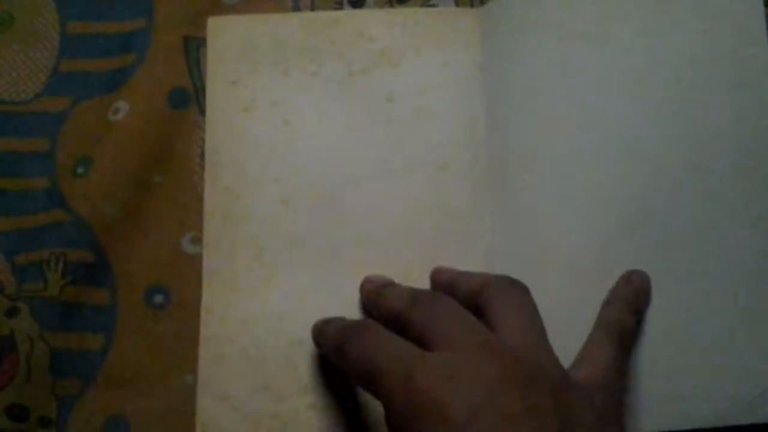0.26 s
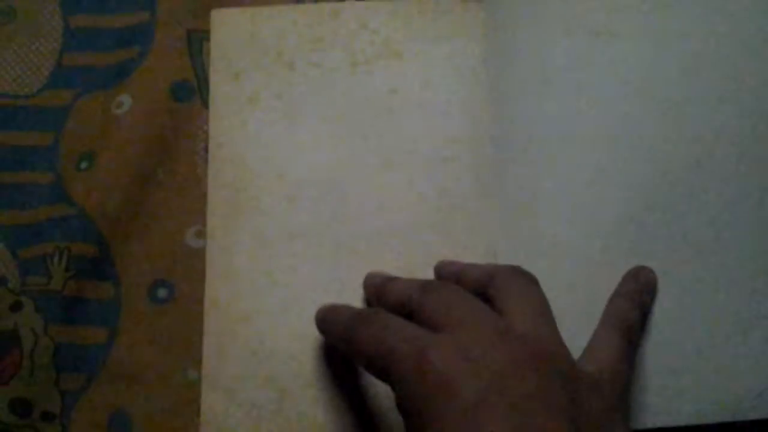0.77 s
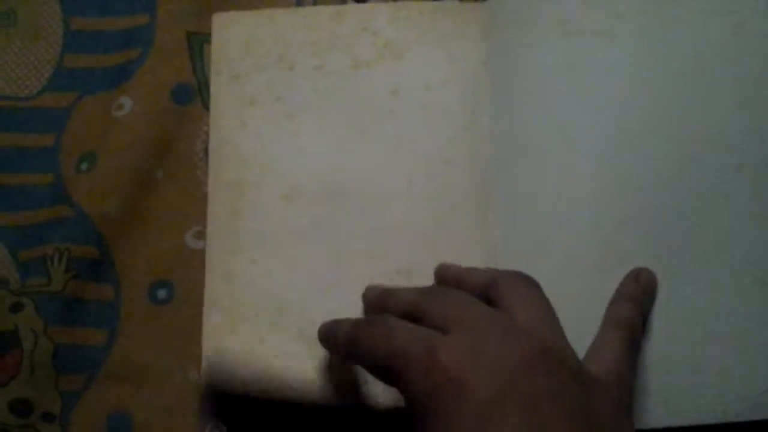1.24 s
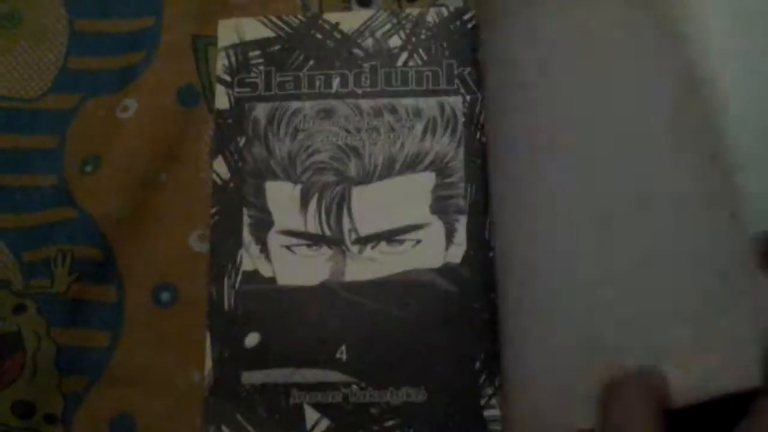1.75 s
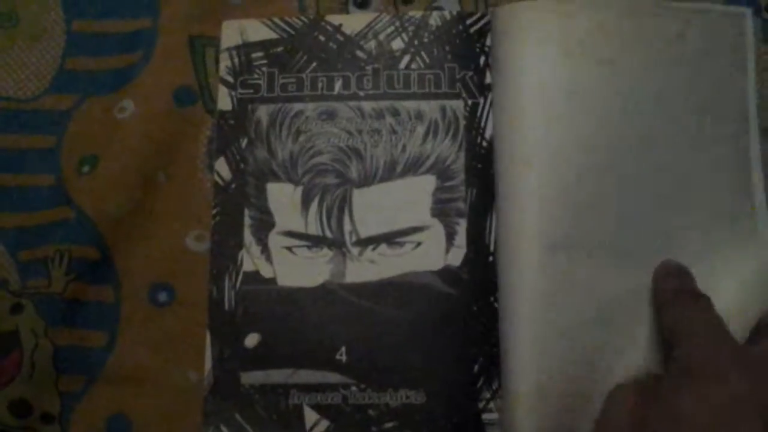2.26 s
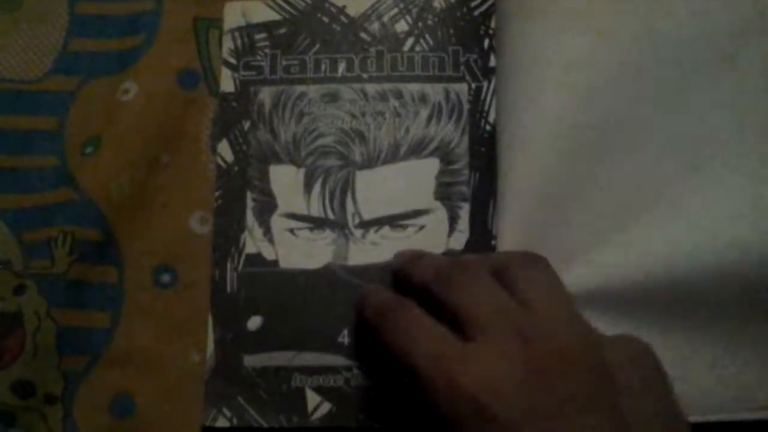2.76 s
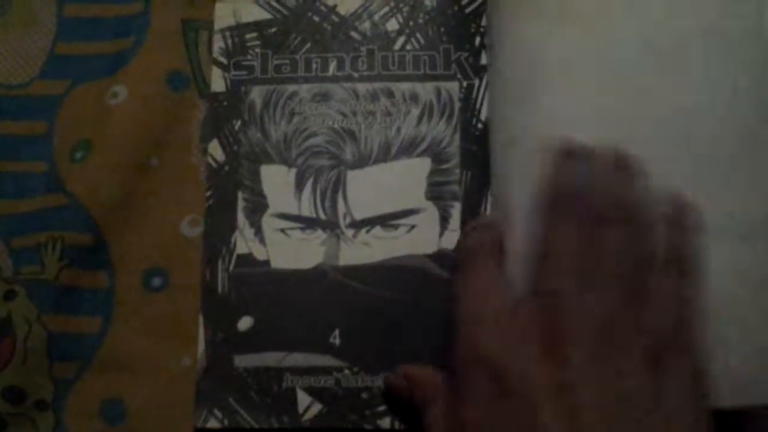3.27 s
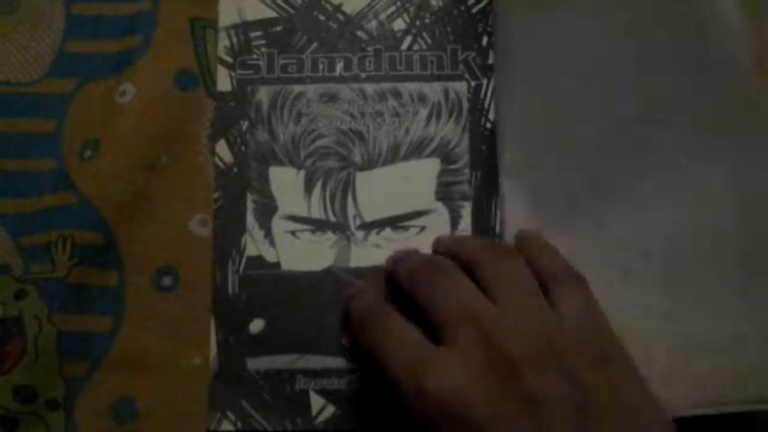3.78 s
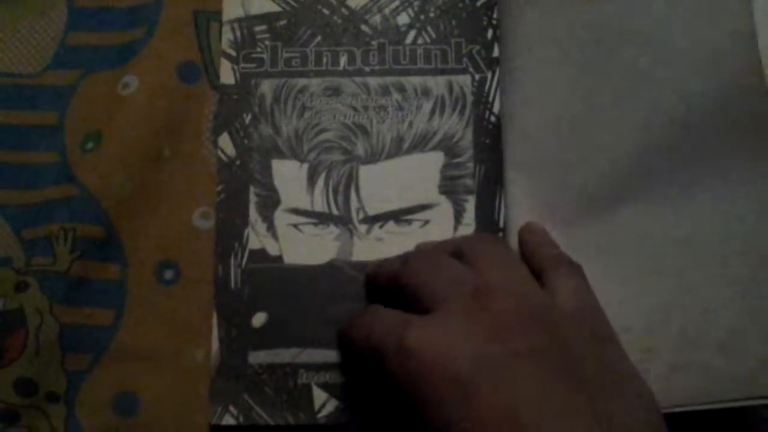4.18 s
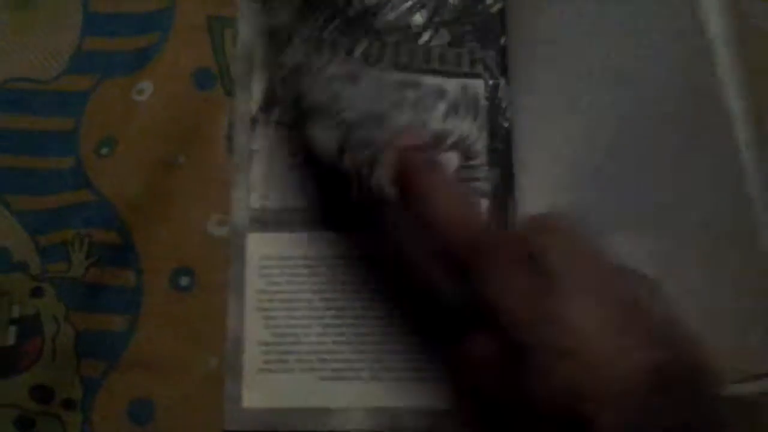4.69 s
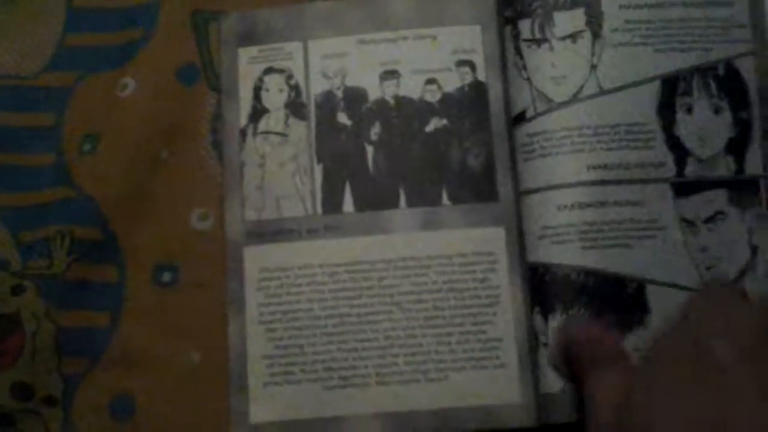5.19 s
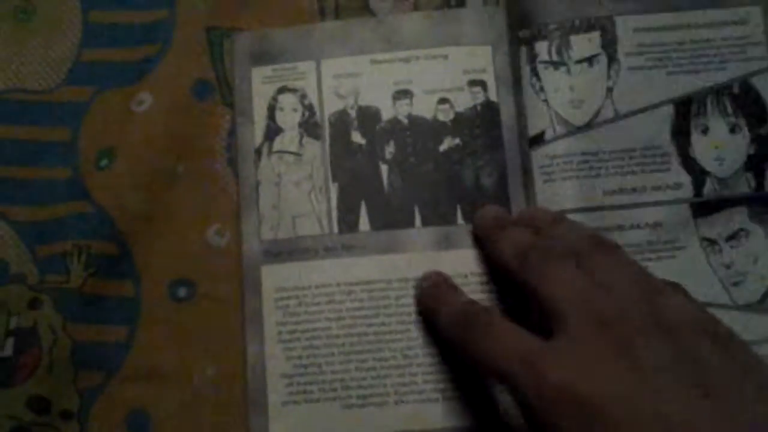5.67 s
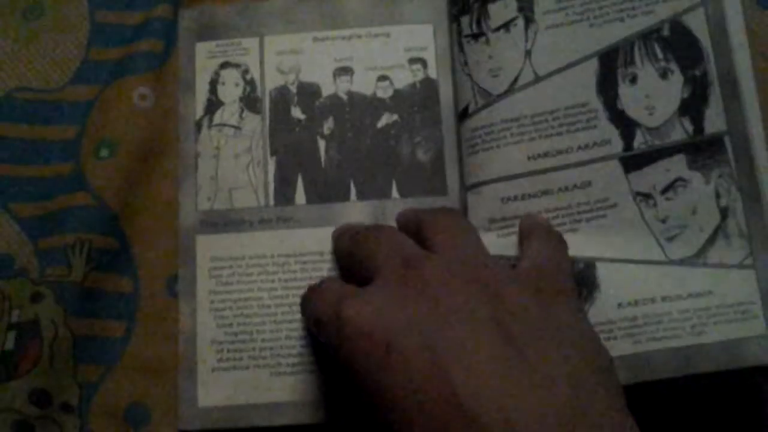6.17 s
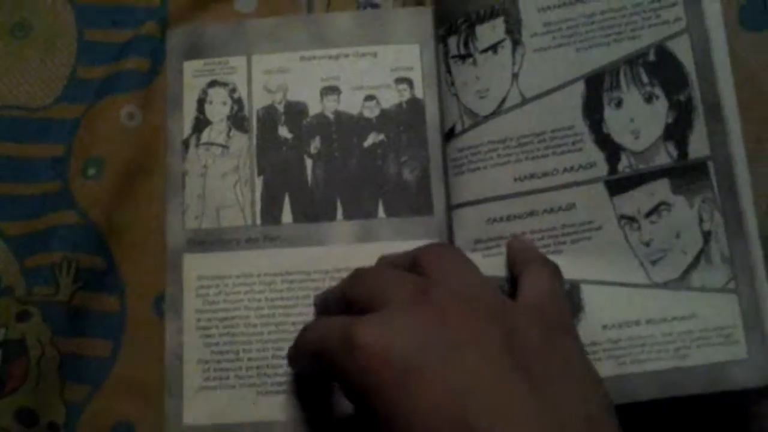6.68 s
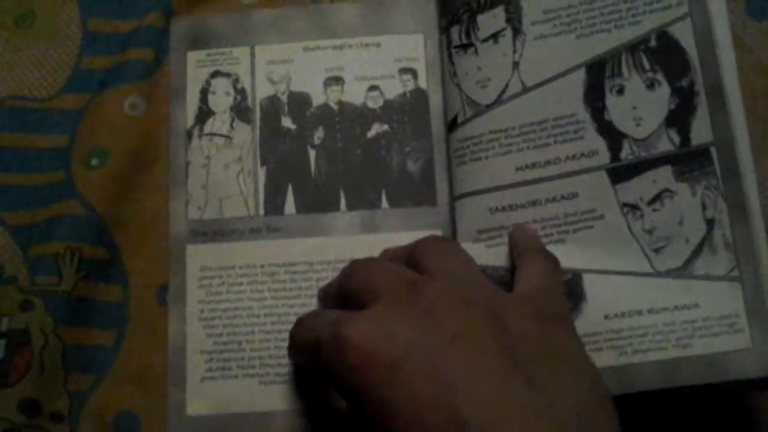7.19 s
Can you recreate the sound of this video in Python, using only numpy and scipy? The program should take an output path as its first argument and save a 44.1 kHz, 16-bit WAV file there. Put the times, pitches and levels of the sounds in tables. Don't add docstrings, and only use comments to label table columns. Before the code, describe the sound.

Close paper flicks run at a brisk, slightly uneven pace, bright at the edge and dull in the body, with a short reflection from a near wall. They stop after three seconds. Low fingertip bumps come next, then a light crinkling page lift and a hard little snap, then soft taps. Steady fan noise, faint rumble and hiss lie beneath, with a distant low hum swelling twice; the sound is almost centred.

```python
import sys
import numpy as np
from scipy import signal
from scipy.fft import rfft, irfft
from scipy.io import wavfile

SR = 44100
rng = np.random.default_rng(int(sys.argv[2]) if len(sys.argv) > 2 else 0)


def to_linear_factor(level_db):
    exponent = np.asarray(level_db, float) / 20
    return 10 ** exponent


def store_wav(level_fs):
    pcm = np.round(np.clip(np.atleast_2d(level_fs), -1, 1) * 32767)
    wavfile.write(sys.argv[1], SR, pcm.T.astype(np.int16))


N = 328104


def unit(x):
    return x / np.sqrt(np.mean(x ** 2) + 1e-20)


def in_time(rows, outside):
    s, *columns = np.transpose(rows)
    t = np.arange(N) / SR
    return [np.interp(t, s, column, left=outside, right=outside) for column in columns]


def drift(rate_hz):
    r = np.exp(-2 * np.pi * rate_hz / SR)
    settled = signal.lfilter([1], [1, -2 * r, r * r], rng.standard_normal(N + SR))[SR:]
    return unit(settled)


def colour(x, spectrum, peaks=()):
    size = 8192
    hz = np.maximum(np.fft.rfftfreq(size, 1 / SR), 1)
    points = np.array(spectrum)
    gain = to_linear_factor(np.interp(np.log(hz), np.log(points[:, 0]), points[:, 1]))
    for centre, width, peak_db in peaks:
        gain = gain * to_linear_factor(peak_db / (1 + (2 * (hz - centre) / width) ** 2))
    cepstrum = irfft(np.log(gain + 1e-6))
    cepstrum[1:size // 2] *= 2
    cepstrum[size // 2 + 1:] = 0
    response = irfft(np.exp(rfft(cepstrum)))
    return signal.fftconvolve(x, response / np.sqrt(np.sum(response ** 2)))[:N]


def grains(per_s, spread_db):
    sizes = to_linear_factor(spread_db * np.minimum(rng.exponential(1, N), 4)) * rng.standard_normal(N)
    return unit(sizes * (rng.random(N) < per_s / SR))


# [t/s, level/dB]
SLIDE = [(0.0, -47), (0.13, -61), (0.3, -59), (0.55, -68), (0.85, -54.5), (2.0, -57), (2.75, -50.5),
         (3.1, -61)]
# [f/Hz, level/dB per Hz]
EDGE = [(2650, -17.5), (4500, -13), (6150, -15), (6470, -10.5), (8750, 0.5), (11400, -0.5), (12600, -7.5),
        (13900, -5.5), (14600, 15), (15000, -0.5)]
# [f/Hz, level/dB per Hz]
BODY = [(88, -56), (150, -20), (326, -1), (872, -5.5), (1280, -4.5), (1590, -8), (3570, -8.5),
        (5000, -19.5), (6500, -66), (11000, -120)]
# [f/Hz, width/Hz, level/dB over the spectrum]
BLOCK = [(597, 67, 9), (1273, 147, 9), (1988, 70, 9), (3507, 47, 6), (8490, 105, 9.5), (9000, 60, 8),
         (10220, 250, 5), (11900, 71, -3)]
TAIL_DB = -7.0


def riffle():
    slide = to_linear_factor(in_time(SLIDE, -120)[0] + 2.0 * drift(27))
    s, edge_db, slap_db = contacts()
    edge = strokes(s, edge_db - 7, rise_s=.005, fall_s=.008, tail_db=TAIL_DB) + slide
    body = strokes(s - .004, slap_db - 7.0, rise_s=0.0081, fall_s=0.013, tail_db=TAIL_DB + 6.0)
    crackle = to_linear_factor(1.8 * drift(70))
    crisp = colour(edge * crackle * grains(16000, 0.96), EDGE, BLOCK)
    dull = colour((body + to_linear_factor(8) * slide) * grains(12000, 0.98), BODY, BLOCK)
    return crisp + dull


# [t/s, edge peak level/dB, slap peak level/dB, rebound delay/s, rebound peak level/dB]
FLICKS = [(0.0315, -17, -26.5, 0.13, -28), (0.311, -18, -25.5, 0.13, -32), (0.603, -13.5, -22.5, .097, -24),
          (0.8, -8, -12, 0.083, -21), (1.006, -13, -22.5, 0.097, -25), (1.214, -13, -18, 0.09, -24),
          (1.4247, -15, -19.5, 0.098, -26.5), (1.6353, -9.5, -12.5, 0.086, -20.5),
          (1.8182, -12, -17.5, 0.082, -26), (2.029, -12.5, -18, .091, -22.5),
          (2.2187, -12.5, -19, 0.078, -23.5), (2.421, -13.5, -19, 0.1, -23.5),
          (2.6162, -9, -12, 0.081, -19), (2.799, -13, -19.5, 0.09, -31)]
# [lead/s, edge peak level/dB, slap peak level/dB]
CATCHES = [
    (.071, -28.5, -38),
    (0.035, -24, -30),
]
# [t/s, peak level/dB]
FOLLOWERS = [(.0653, -30), (0.343, -24.5), (.6275, -26), (1.032, -26), (1.2406, -24.5), (1.4511, -39)]
CATCH_SCATTER_S, CATCH_SCATTER_DB = .004, 2.0
REBOUND_EDGE_DB = -7.5


def contacts():
    rows = [(s, db, db) for s, db in FOLLOWERS]
    chance = rng.standard_normal((len(FLICKS), len(CATCHES), 2))
    for (s, edge_db, slap_db, delay, rebound_db), luck in zip(FLICKS, chance):
        rows.append((s, edge_db, slap_db))
        rows.append((s + delay, rebound_db + REBOUND_EDGE_DB, rebound_db))
        for (lead, catch_db, dull_db), (early, louder) in zip(CATCHES, luck):
            catch_s = s - lead + CATCH_SCATTER_S * early
            rows.append((catch_s, catch_db + CATCH_SCATTER_DB * louder, dull_db))
    return np.transpose([row for row in rows if row[0] > .01])


WALL_S, WALL_DB = .021, -2.5
TAIL_T60_S = .15
BEND_S, BEND_DB = 0.042, -19.5


def strokes(times, levels_db, rise_s, fall_s, tail_db):
    marks = np.zeros(N)
    marks[(np.asarray(times) * SR).astype(int)] = to_linear_factor(levels_db) ** 2
    lead = SR // 4
    t = (np.arange(SR) - lead) / SR
    bend = to_linear_factor(BEND_DB) ** 2 * np.exp(-2 * np.abs(t) / BEND_S) * (t < rise_s)
    hit = np.clip(t / rise_s, 0, 1) ** 2 * np.exp(-2 * np.maximum(t - rise_s, 0) / fall_s)
    echo = to_linear_factor(WALL_DB) ** 2 * np.interp(t - WALL_S, t, hit)
    decay_db = tail_db - 60 * np.maximum(t - WALL_S, 0) / TAIL_T60_S
    tail = to_linear_factor(decay_db) ** 2 * np.clip(t / WALL_S, 0, 1)
    power = signal.fftconvolve(marks, bend + hit + echo + tail)[lead:lead + N]
    return np.sqrt(np.maximum(power, 0))


# [t/s, level/dB]
TURN = [
    (4.6, -61),
    (4.998, -55),
    (5.28, -64),
    (5.5, -59),
]
# [t/s, peak level/dB]
CRUMPLES = [(4.7844, -41), (4.8464, -34), (4.9124, -39), (4.9354, -42), (4.9744, -35), (5.034, -32),
            (5.1094, -48), (5.1344, -40), (5.1894, -52), (5.2639, -40), (5.2994, -43), (5.3564, -44)]


def page_turn():
    s, peak_db = np.transpose(CRUMPLES)
    marks = np.zeros(N)
    marks[(s * SR).astype(int)] = to_linear_factor(peak_db - 5.0)
    flares = signal.lfilter([1], [1, -np.exp(-1 / (0.015 * SR))], marks + 1e-18)
    level = to_linear_factor(in_time(TURN, -120)[0] + 2.6 * drift(30)) + flares
    spectrum = [(500, -34), (1000, 2), (2000, -17), (3500, 9), (6000, -17), (9000, -2.5), (15000, -6.0)]
    return colour(level * grains(8000, 1.7), spectrum)


def knocks(rows, cycles, crack_db):
    out = np.zeros(N + SR)
    t = np.arange(SR // 10) / SR
    for s, peak_db, hz in rows:
        age = t * hz / cycles
        ring = np.sin(2 * np.pi * hz * t) * age * np.exp(1 - age)
        fading = np.exp(-t / 0.0012) + 0.39 * np.exp(-t / 0.014)
        crack = to_linear_factor(crack_db) * np.diff(rng.standard_normal(len(t) + 1)) * fading
        out[int(s * SR):][:len(t)] += to_linear_factor(peak_db) * (ring + crack)
    return out[:N]


# [t/s, peak level/dB, f/Hz]
SNAPS = [
    (3.241, -26, 3500),
    (5.0336, -13.5, 4000),
    (5.143, -32, 3850),
    (5.264, -34, 3320),
]


def snaps():
    return knocks(SNAPS, cycles=0.91, crack_db=-18.0)


# [t/s, peak level/dB, f/Hz]
TAPS = [(.07, -22, 516), (.35, -21, 268), (.605, -30, 193), (1.635, -44, 72), (2.61, -42, 45),
        (4.2195, -15, 302), (4.235, -23, 284), (4.31, -28, 500), (4.47, -33, 185), (4.74, -17.5, 1000),
        (5.53, -26, 260), (6.32, -27, 234), (6.35, -32, 181), (6.65, -29.5, 214)]


def taps():
    high_pass = signal.butter(1, 60, "high", fs=SR, output="sos")
    return signal.sosfilt(high_pass, knocks(TAPS, cycles=0.6, crack_db=-50))


# [t/s, f/Hz, level/dB]
HUMS = [
    [(.75, 208, -60), (.9, 200.3, -51), (1.2, 202, -58), (1.42, 207, -57), (1.56, 214.3, -43.5),
     (1.72, 206, -54), (2.0, 194.4, -52.5), (2.3, 196, -62)],
    [(7.05, 199.5, -72), (7.16, 199, -45), (7.23, 200, -41), (7.3, 199, -46), (7.44, 203, -63)],
]


def hum():
    out = 0
    for rows in HUMS:
        hz, level_db = in_time(rows, -150)
        out = out + to_linear_factor(level_db + 8) * np.sin(2 * np.pi * np.cumsum(hz) / SR)
    return out


# [f/Hz, level/dB per Hz]
FAN = [(76, -49.5), (130, -17.5), (167, -15.5), (239, -7.5), (326, -4.5), (370, 0), (439, -1), (537, 1),
       (581, -2), (942, -6.5), (1050, -4.5), (1900, -14), (2290, -10), (2850, -18), (4300, -28),
       (5400, -41.5), (7020, -76), (11900, -120)]
FAN_DB, FAN_SWAY_DB = -30, -0.32


def fan():
    flutter = to_linear_factor(0.37 * drift(6.0) + 0.43 * drift(43))
    roar = colour(grains(12000, 1.34) * flutter, FAN)
    return to_linear_factor(FAN_DB + FAN_SWAY_DB * drift(1.0)) * roar


# [t/s, level/dB]
RUMBLE = [(0.0, -63), (0.56, -64), (0.91, -73), (2.6, -72), (4.1, -67), (5.5, -63), (6.5, -61), (7.44, -74)]


def rumble():
    lumps = rng.standard_normal(N) * to_linear_factor(2.0 * drift(4.2))
    spectrum = [(20, -20), (50, -11), (80, 4.5), (130, -6), (200, -29)]
    return to_linear_factor(in_time(RUMBLE, -66)[0]) * colour(lumps, spectrum)


# [f/Hz, level/dB per Hz]
HISS = [(3530, -70), (6000, 3), (6630, -4.5), (7410, -2), (8840, 4), (13900, 0), (14500, 20),
        (15000, -41.5)]
HISS_DB = -50.5


def hiss():
    return to_linear_factor(HISS_DB) * colour(rng.standard_normal(N) * to_linear_factor(.5 * drift(20)), HISS)


PARTINGS = [.6, 1.45, 2.05, 2.22, 2.645, 2.81]
PARTING_S, PARTING_DB = .018, -16


def channel_trace(pages):
    distance_s = np.abs(np.arange(N) / SR - np.array(PARTINGS)[:, None]).min(axis=0)
    parted = distance_s < PARTING_S
    return to_linear_factor(PARTING_DB) * parted * signal.lfilter([1, -.7], [1], np.roll(pages, 300))


def scene():
    pages = riffle() + page_turn()
    hand = snaps() + taps()
    mono = pages + hand + hum() + fan() + rumble() + hiss()
    trace = channel_trace(pages)
    return np.stack([mono + trace, mono - trace])


def roll_off(x):
    return signal.sosfilt(signal.butter(12, 15690, fs=SR, output="sos"), x)


def record(dry):
    thin = signal.sosfilt(signal.butter(1, 60, "high", fs=SR, output="sos"), dry)
    cut = signal.sosfilt(signal.cheby2(12, 60, 15000, fs=SR, output="sos"), thin)
    return roll_off(cut)


dry = scene()
out = record(dry)
store_wav(out)
```